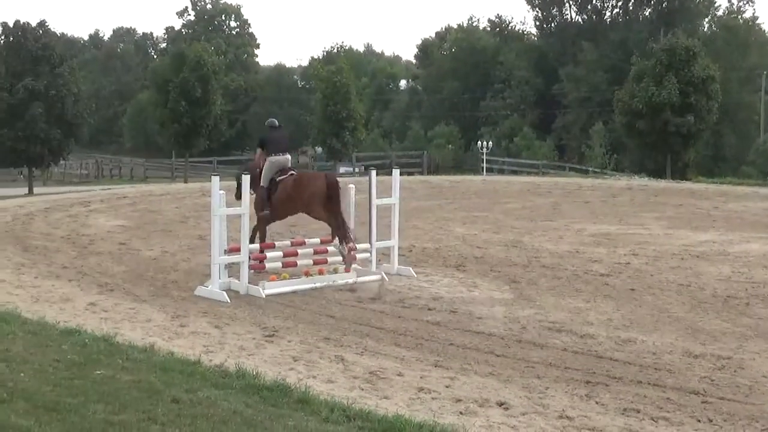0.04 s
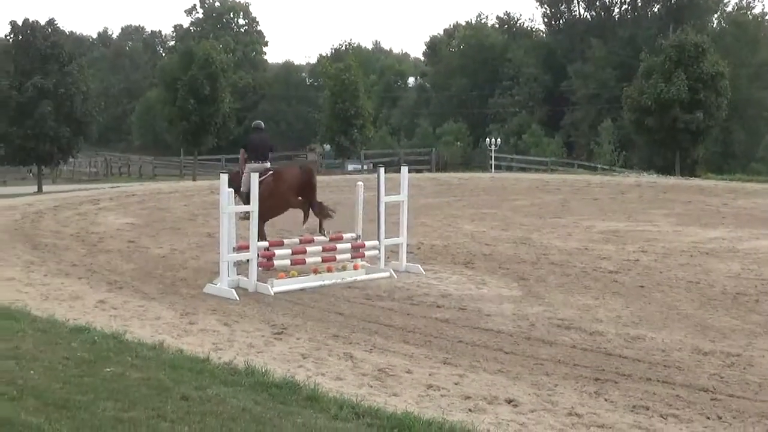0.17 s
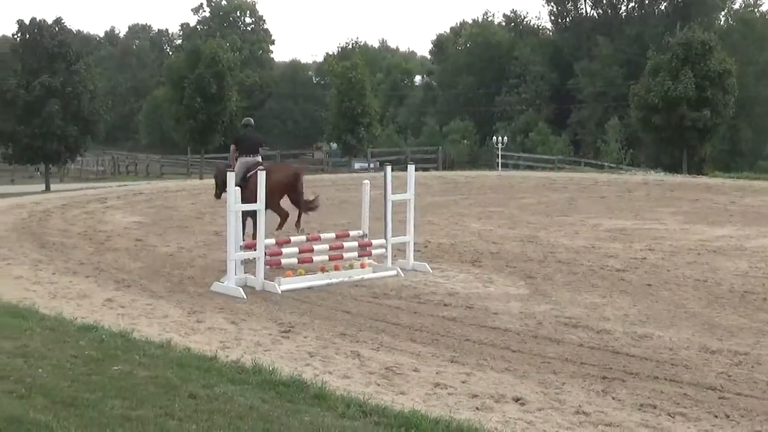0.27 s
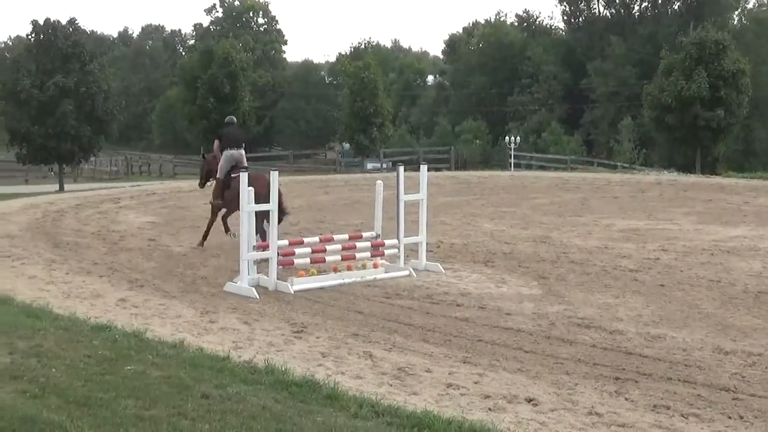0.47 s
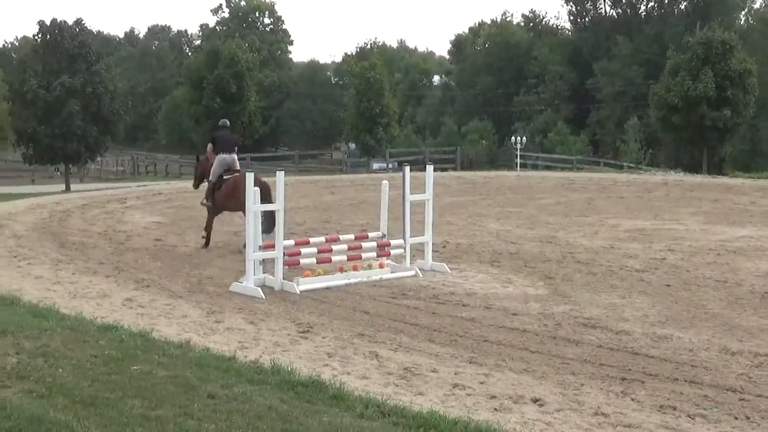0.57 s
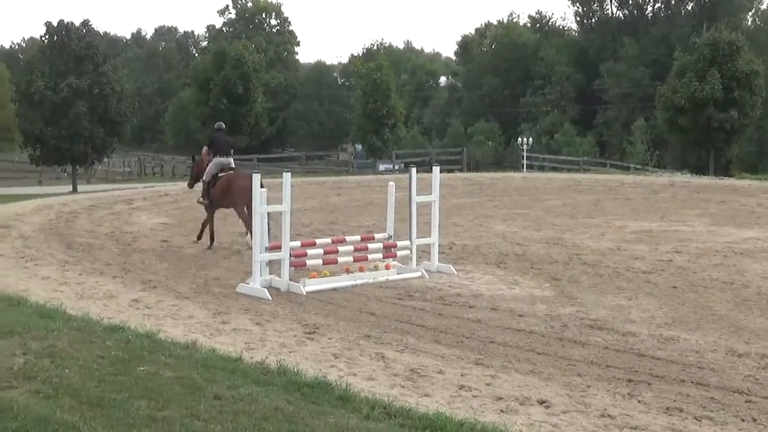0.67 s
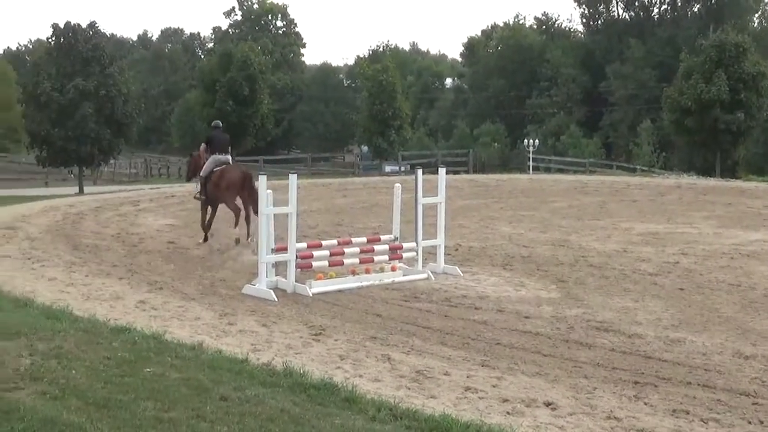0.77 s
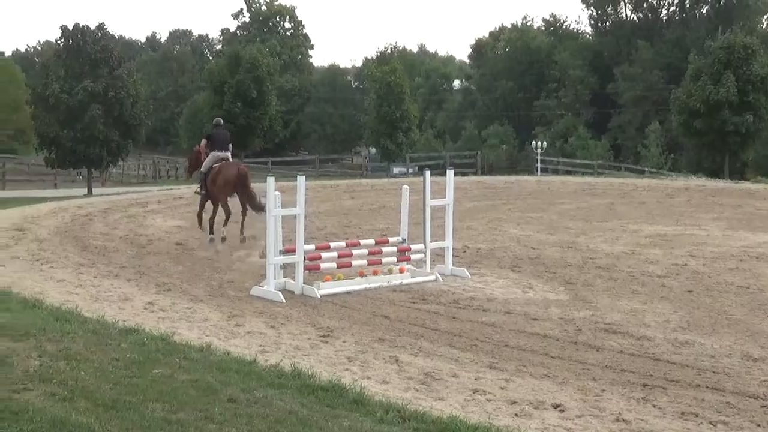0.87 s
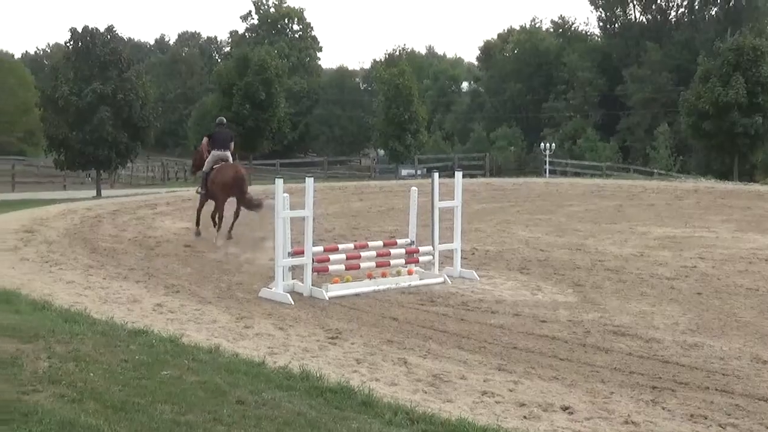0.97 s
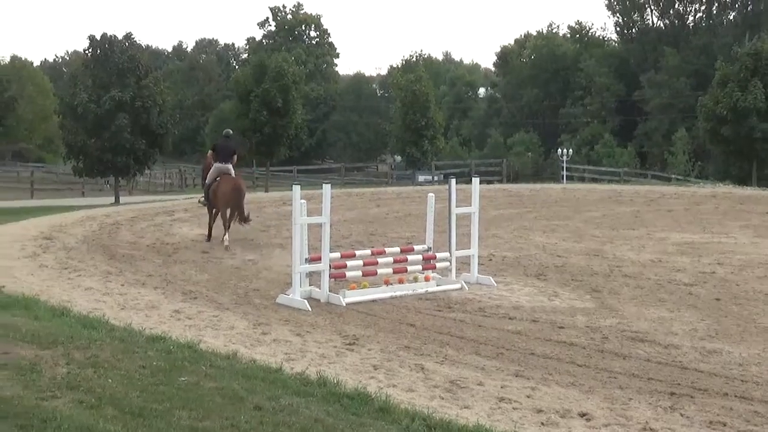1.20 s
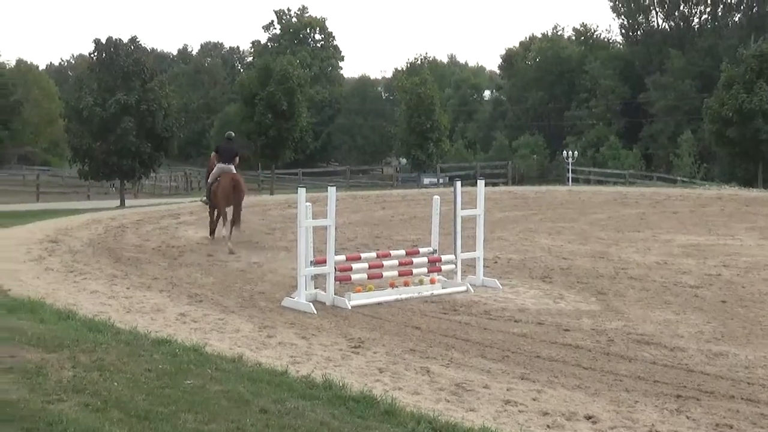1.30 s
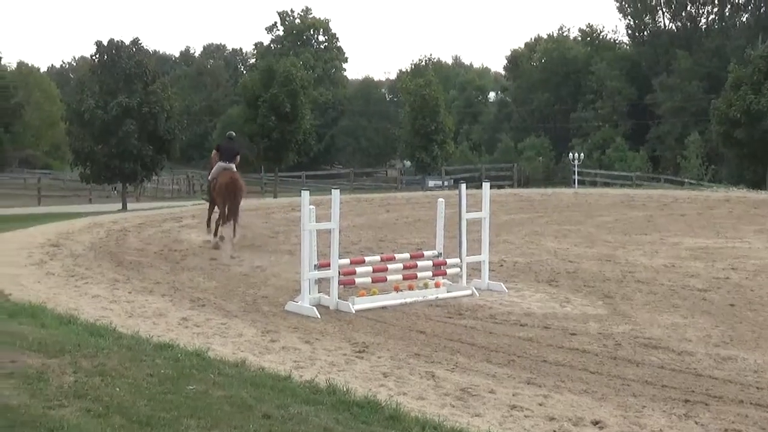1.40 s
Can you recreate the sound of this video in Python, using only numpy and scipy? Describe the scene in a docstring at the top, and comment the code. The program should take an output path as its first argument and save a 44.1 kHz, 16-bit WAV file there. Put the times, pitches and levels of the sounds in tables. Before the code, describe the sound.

A hollow jump pole knocks sharply as a horse clips it, then bounces and rattles in its steel cups, slightly to the left. Dull hoofbeats thud and scuff away through sand outdoors, with faint insects behind.

```python
"""A hollow jump pole knocks and bounces as a cantering horse clips it in a sandy outdoor arena.
Each impact excites the pole's damped modes; the pole chatters in its steel cups, which ring on.
Hooves thud and scuff away through the sand. An insect pulses in the grass and a small bird chips
over a low outdoor rumble, while fences and trees scatter back a faint echo."""
import sys
import numpy as np
from scipy import signal
from scipy.fft import rfft, irfft
from scipy.io import wavfile

SR = 44100
rng = np.random.default_rng(int(sys.argv[2]) if len(sys.argv) > 2 else 0)


def wrap_up_sound(samples):
    """Save the sound to the file named by the first command line argument, as 16-bit audio."""
    columns = np.atleast_2d(samples).T
    # keep every value between -1 and 1, then stretch to whole-number steps
    tamed = np.clip(columns, -1, 1)
    steps = np.round(tamed * 32767).astype(np.int16)
    wavfile.write(sys.argv[1], SR, steps)


N = 63945

# Blows on the pole. Each row: centre in seconds, level in dB, contact pitch in Hz, relative crack in dB.
KNOCKS = [(.3263, -11, 1000, 2), (.3307, -8.5, 830, -19), (.3351, -18, 900, -10), (.3374, -10, 920, -13),
          (.3427, -13, 960, -14), (.3508, -22, 900, -8), (.4874, -22, 970, -9), (.4905, -23, 970, -11),
          (.4947, -26, 970, -4), (.5039, -26, 950, 2), (.5080, -28, 975, -4)]
# Modes of the pole and of the cups. Each row: frequency in Hz, gain in dB, 60 dB decay time in seconds.
POLE_MODES = [(245, -25, .08), (385, -16, .07), (590, -26, .06), (742, -19, .085), (903, -24, .055),
              (978, -14.5, .115), (1165, -26, .12), (1700, -26, .2)]
CUP_MODES = [(2422, -12.5, .13), (2911, -8.5, .11), (3379, -4.5, .08), (5686, -16, .5), (6100, -17, .22),
             (7452, -15, .16), (7704, -5, .1), (8456, -7, .06), (8710, -15, .15), (9130, -17, .12),
             (9839, -7, .05), (10340, -13, .1), (10755, -15, .14)]
# Bouts of chatter. Each row: start, hold and decay in seconds; level, treble lift and ring gain in dB.
RATTLES = [(0.327, 0.00083, 0.00093, -31, -3, -38), (0.3317, 0.0017, 0.015, -25, 5.5, -7.5),
           (0.3443, .01, 0.006, -27.5, 5, -0.5), (0.354, 0.026, 0.018, -36, 1, -3.5),
           (0.432, 0.012, 0.1, -37.5, -5.5, -18), (0.4925, 0.01, 0.016, -30, 0.5, -5.5),
           (0.526, 0.0043, .002, -44, 9, -8), (0.595, 0.057, 0.045, -49.5, -4, -11.5)]
# Slides on a cup's lip. Each row: peak in seconds, frequency in Hz, level in dB, rise in seconds.
LIP_RINGS = [(.372, 4489, -30.5, .018), (.457, 4489, -36.5, .012), (.512, 4288, -31, .009),
             (.527, 4489, -39, .003), (.61, 4489, -45.5, .008)]
# Hoof falls. Each row: start in seconds, level in dB, pitch in Hz, rise in seconds, relative grit in dB.
HOOF_FALLS = [(0.144, -32.5, 210, 0.0019, -44), (0.147, -24, 400, 0.0039, -5.5),
              (0.2245, -16.5, 297, 0.0035, -22.5), (0.634, -22.5, 222.6, 0.0043, -19),
              (0.7825, -31, 318, 0.0046, -16), (1.207, -31, 217, 0.005, -21.5),
              (1.262, -34.5, 168, 0.0021, -27), (1.367, -29, 217, 0.0041, -20)]
# Distant hoof clacks. Each row: start in seconds, level in dB, frequency in Hz.
CLACKS = [(1.329, -44.5, 1110), (1.418, -42, 950)]
# Scuffs and falling sand. Each row: centre in seconds, half-width in seconds, level in dB.
SCUFFS = [(0.61, 0.0075, -39.5), (0.755, 0.022, -50.5), (0.86, 0.038, -55.5), (0.923, 0.012, -42),
          (1.447, 0.0084, -53.5)]
PATTERS = [(0.178, 0.015, -46), (0.584, 0.028, -40), (1.23, 0.015, -40.5), (1.256, 0.0082, -53)]
# Bird chips. Each row: centre in seconds, level in dB.
CHIPS = [(.160, -57), (.191, -54), (.226, -54), (1.039, -54), (1.077, -52)]
# Spectra. Each row: frequency in Hz, relative level in dB.
CRACK_SPECTRUM = [(60, 3), (160, -9), (400, 13.5), (520, 0.5), (1200, 8.5), (1600, -1), (3000, -3),
                  (11000, -22.5)]
CLATTER_SPECTRUM = [(300, -2), (1150, 5), (1700, 1.5), (2600, -1), (3250, 3.5), (4000, -4), (6500, -3.5),
                    (7600, -1), (8000, 4.5), (8600, 2), (9700, -0.5), (11000, -8.5)]
CLATTER_SIDE_SPECTRUM = [(400, 5), (2000, 10), (9000, -2)]  # the part that differs between the ears
GRIT_SPECTRUM = [(200, -26), (800, 5.5), (1500, -11.5), (2600, 1), (4000, -15), (10000, -15)]
GROUND_SPECTRUM = [(30, -29), (70, 24.5), (190, 3), (400, 12.5), (800, -69)]
SCUFF_SPECTRUM = [(200, -6), (550, -3), (800, 8), (1050, 8), (1350, -6), (1850, 2), (2450, -9), (3000, -6),
                  (5000, -15), (11000, -19)]
PATTER_SPECTRUM = [(40, -5.5), (110, 1), (300, -3), (480, -30), (1100, -51), (3000, -61)]
AIR_SPECTRUM = [(12, -50), (20, -2), (88, 3), (619, -14), (1020, -15.5), (1560, -20), (4980, -26),
                (5990, -29.5), (8010, -29), (8670, -16.5), (11000, -53), (14300, -72), (22000, -120)]
CHORUS_SPECTRUM = [(3500, -28), (5100, -5), (6500, -17), (7900, -4), (8650, -14), (9300, -6), (11000, -8.5)]
ECHO_SPECTRUM = [(300, -0.5), (850, -5.5), (1500, 6.5), (11000, -8.5)]

KNOCK_S, CRACK_S, CRACK_DB, POLE_SCATTER_S = .0013, .003, -3, .003
CLATTER_DB, TREBLE_HZ, CUP_WIDTH, LIP_T60_S = -1, 6800, .3, .085
SAG_RATIO, SAG_S, GRIT_S, CLACK_S = .14, .0091, .0058, .0014
GROUND_DB, GROUND_RISE_S = -24, .0125
INSECT_HZ, INSECT_DB, STROKE_S, FIRST_STROKE_S, STROKE_PERIOD_S = 8800, -45.5, .0052, .022, .05655
BACKSTROKE_DELAY_S, BACKSTROKE_DB = .021, -15


def pole():
    """Impact excitation: each blow gives a hollow bark and a dull crack, and sets damped modes ringing."""
    t = since(0)
    wood, kicks, crack_power = 0, np.zeros(N), 0
    for at, db, hz, crack_db in KNOCKS:
        wood += undb(db) * swell(at, KNOCK_S) * np.cos(2 * np.pi * hz * (t - at))
        kicks[round((at - .25 / hz) * SR)] += undb(db)  # a quarter cycle before the bark peaks
        age = since(at - 2 * KNOCK_S)
        crack_power += (undb(db + crack_db) * (age > 0) * np.exp(-age / CRACK_S)) ** 2
    for hz, db, t60 in POLE_MODES:
        wood += undb(db) * convolve(kicks, np.sin(2 * np.pi * hz * t) * decay(0, t60))
    scatter = unit(rng.standard_normal(N) * np.exp(-t / POLE_SCATTER_S)) / np.sqrt(N)
    crack = undb(CRACK_DB) * np.sqrt(crack_power) * noise(CRACK_SPECTRUM, width=.069)
    return spread(wood, convolve(wood, scatter), width=.17) + crack


def cups():
    """Resonance: the pole clatters in its cups, whose steel stores the energy and rings it out."""
    out, drives = 0, []
    freqs = np.fft.rfftfreq(N, 1 / SR)
    for start, hold, fall, db, treble_db, steel_db in RATTLES:
        force = undb(db) * (since(start) > 0) * np.exp(-since(start + hold) / fall)
        mid, side = (unit(force * clicks(per_s=4500, spread_db=2.5)) for _ in range(2))
        bout = spread(colour(mid, CLATTER_SPECTRUM), colour(side, CLATTER_SIDE_SPECTRUM), CUP_WIDTH)
        bout *= undb(CLATTER_DB) * np.sqrt(np.mean(force ** 2))
        out += irfft(rfft(bout) * treble_shelf(freqs, treble_db), N)
        drives.append((undb(steel_db) * force, treble_db))
    for hz, db, t60 in CUP_MODES:
        power = sum((drive * treble_shelf(hz, treble_db)) ** 2 for drive, treble_db in drives)
        energy_decay = decay(0, t60) ** 2
        stored = np.abs(convolve(power, energy_decay / energy_decay.sum()))
        out += undb(db) * np.sqrt(stored) * steel_tone(hz)
    return out


def cup_lips():
    """Friction excitation: a clear ring swells as the pole slides on a cup's lip, then decays freely."""
    out = 0
    for at, hz, db, rise in LIP_RINGS:
        envelope = np.where(since(0) < at, swell(at, rise), decay(at, LIP_T60_S))
        out += undb(db) * envelope * steel_tone(hz) / np.sqrt(2)
    return out


def steel_tone(hz, waver=.18):
    """Random modulation: a steel ring of rms near 1 wavers in phase and amplitude."""
    mid, side = (np.sin(2 * np.pi * (hz * since(0) + rng.random()) + waver * walk(rate=71))
                 for _ in range(2))
    return np.sqrt(2) * spread(mid, side, CUP_WIDTH) * (1 + waver * walk(rate=90))


def hooves():
    """Inelastic impact: a hoof packs the sand, grit spits, the ground shudders; distant hooves clack."""
    out, grit, ground = 0, noise(GRIT_SPECTRUM, width=.34), noise(GROUND_SPECTRUM, width=.1)
    for start, db, hz, rise, grit_db in HOOF_FALLS:
        t = since(start)
        # The pitch sags towards SAG_RATIO * hz as the hoof sinks.
        cycles = hz * (SAG_RATIO * t + (1 - SAG_RATIO) * SAG_S * (1 - np.exp(-t / SAG_S)))
        thud = bump(start, rise) ** 2 * np.sin(2 * np.pi * cycles)
        spit = undb(grit_db) * (t > 0) * np.exp(-t / GRIT_S) * grit
        shudder = undb(GROUND_DB) * bump(start, GROUND_RISE_S) * ground
        out += undb(db) * (thud + spit + shudder)
    for start, db, hz in CLACKS:
        out += undb(db) * bump(start, CLACK_S) * np.sin(2 * np.pi * hz * since(start))
    return out


def sand():
    """Granular noise: hooves crunch through the sand and throw clods that patter down."""
    scuffs = sum(undb(db) * swell(at, half) for at, half, db in SCUFFS)
    patters = sum(undb(db) * swell(at, half) for at, half, db in PATTERS)
    mid, side = (colour(clicks(per_s=1400, spread_db=3), SCUFF_SPECTRUM) for _ in range(2))
    return scuffs * spread(mid, side, width=.55) + patters * noise(PATTER_SPECTRUM, width=.036)


def insect():
    """Stridulation: evenly spaced rasping strokes, each followed by a weak backstroke."""
    out = 0
    for at in np.arange(FIRST_STROKE_S, N / SR, STROKE_PERIOD_S):
        hz = INSECT_HZ + 20 * rng.standard_normal()
        stroke = chirp(at, STROKE_S, hz, arch_hz=140, fall_hz_per_s=1200)
        backstroke = chirp(at + BACKSTROKE_DELAY_S, STROKE_S, hz=9050, arch_hz=37, fall_hz_per_s=0)
        out += stroke + undb(BACKSTROKE_DB) * backstroke
    return undb(INSECT_DB) * out * (1 + .51 * walk(rate=120))


def bird():
    """Frequency sweep: each chip is a brief falling whistle whose level flutters."""
    chips = sum(undb(db) * chirp(at, half=.0085, hz=4930, arch_hz=60, fall_hz_per_s=17000)
                for at, db in CHIPS)
    return chips * (1 + .19 * walk(rate=260))


def air(rumble_db=-49.5, chorus_db=-60):
    """Ambient noise: outdoor rumble and hiss, with far insects merging into a flickering chorus."""
    rumble = undb(rumble_db) * noise(AIR_SPECTRUM, width=.2)
    return rumble + undb(chorus_db + 2 * walk(rate=17.64)) * noise(CHORUS_SPECTRUM, width=.2)


def echo(x, db=-23, onset_s=.05, t60=.6):
    """Diffuse reflection: fences and trees return a faint tail, different in each ear."""
    envelope = (1 - np.exp(-since(0) / onset_s)) * decay(0, t60)
    tails = unit(envelope * noise(ECHO_SPECTRUM, width=.8)) / np.sqrt(N)
    return undb(db) * np.array([convolve(x, tail) for tail in tails])


def undb(db):
    """Amplitude ratio from decibels."""
    return 10 ** (np.asarray(db) / 20)


def unit(x):
    """Normalisation to rms 1."""
    return x / np.sqrt(np.mean(x ** 2) + 1e-30)


def since(start):
    """Seconds since a moment, zero before it."""
    return np.maximum(np.arange(N) / SR - start, 0)


def decay(start, t60):
    """Exponential damping: 1 until the start, then down 60 dB every t60 seconds."""
    return np.exp(-np.log(1000) * since(start) / t60)


def swell(centre, half):
    """Gaussian envelope with a standard deviation of half seconds."""
    return np.exp(-.5 * ((since(0) - centre) / half) ** 2)


def bump(start, rise):
    """Critically damped envelope, peaking at 1 after the rise."""
    u = since(start) / rise
    return u * np.exp(1 - u)


def chirp(centre, half, hz, arch_hz, fall_hz_per_s):
    """Frequency modulation: a short tone whose pitch follows a tilted arch."""
    t = since(0) - centre
    pitch = hz - arch_hz * (t / half) ** 2 - fall_hz_per_s * t
    return swell(centre, half) * np.sin(2 * np.pi * np.cumsum(pitch) / SR)


def clicks(per_s, spread_db):
    """Poisson process: a dense train of uneven clicks at rms 1."""
    hits = rng.random(N) < per_s / SR
    return unit(hits * np.sign(rng.standard_normal(N)) * undb(spread_db * rng.standard_normal(N)))


def walk(rate):
    """Linear interpolation between random values, rate of them a second."""
    return np.interp(since(0) * rate, np.arange(N), rng.standard_normal(N))


def convolve(x, response):
    """Convolution of a sound with an impulse response."""
    return signal.fftconvolve(x, response)[:N]


def colour(x, spectrum):
    """Spectral shaping that keeps the power of white noise."""
    hz, db = np.array(spectrum, float).T
    freqs = np.maximum(np.fft.rfftfreq(N, 1 / SR), 1)
    gain = undb(np.interp(np.log(freqs), np.log(hz), db))
    return irfft(rfft(x) * unit(gain), N)


def treble_shelf(hz, db):
    """Shelving gain that approaches db above TREBLE_HZ."""
    return undb(db / (1 + (TREBLE_HZ / np.maximum(hz, 1)) ** 8))


def spread(mid, side, width):
    """Mid-side stereo: left and right from a shared and an opposed part."""
    return mid + width * side * np.array([[1], [-1]])


def noise(spectrum, width):
    """Coloured stereo noise of rms near 1."""
    mid, side = (colour(rng.standard_normal(N), spectrum) for _ in range(2))
    return spread(mid, side, width)


def scene():
    """Superposition: the jump, a little to the left, and the horse sound with their echo over the field."""
    pan = undb([[.45], [-.45]])
    near = pan * (pole() + cups() + cup_lips()) + hooves() + sand()
    return near + echo(near.mean(axis=0)) + insect() + bird() + air()


def record(dry, cutoff_hz=11020):
    """Low-pass filtering: the top of the treble is cut steeply."""
    return signal.sosfilt(signal.ellip(12, .2, 70, cutoff_hz, fs=SR, output="sos"), dry)


dry = scene()
out = record(dry)
wrap_up_sound(out)
```